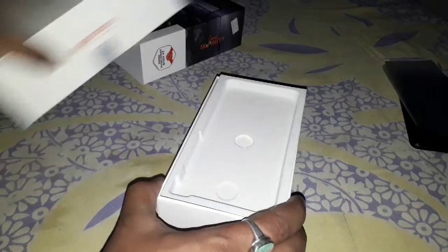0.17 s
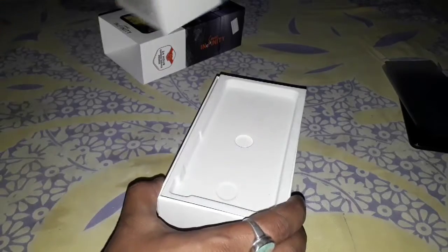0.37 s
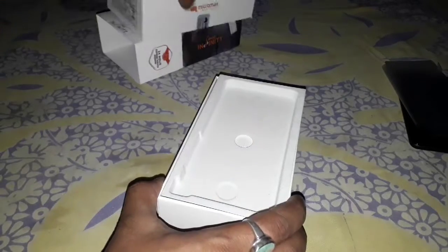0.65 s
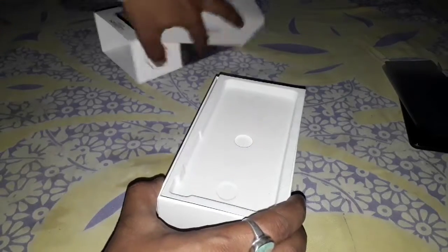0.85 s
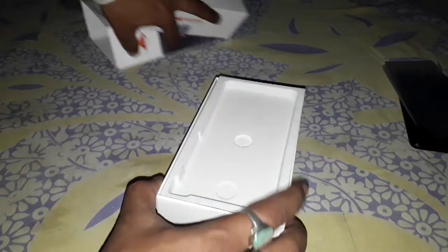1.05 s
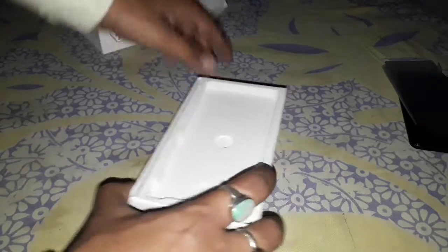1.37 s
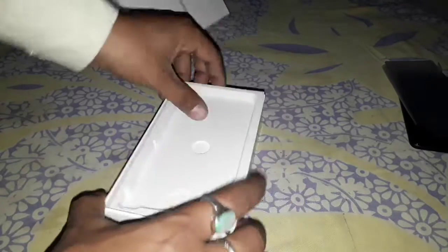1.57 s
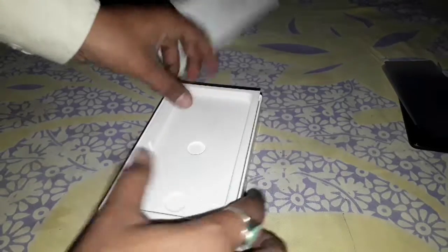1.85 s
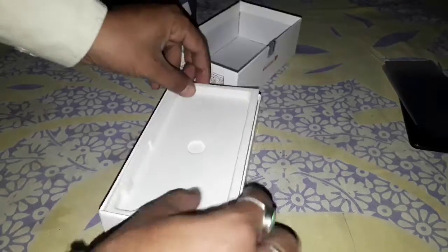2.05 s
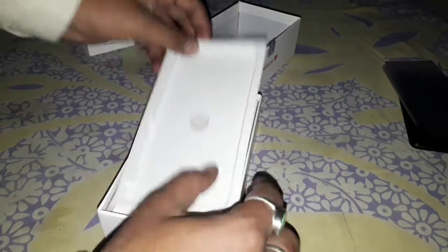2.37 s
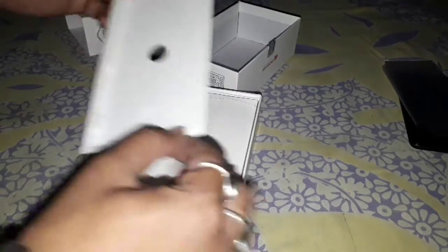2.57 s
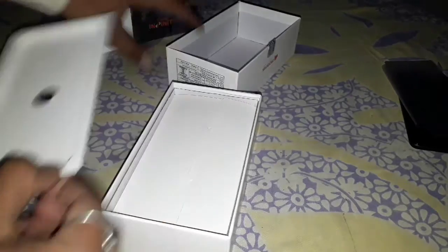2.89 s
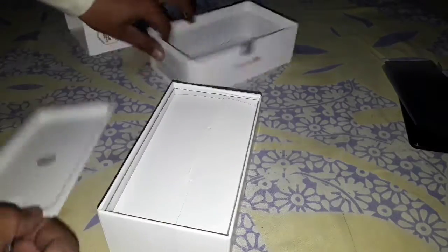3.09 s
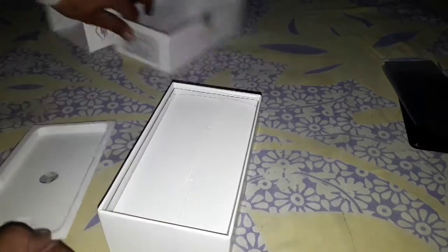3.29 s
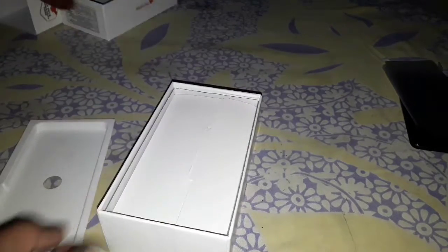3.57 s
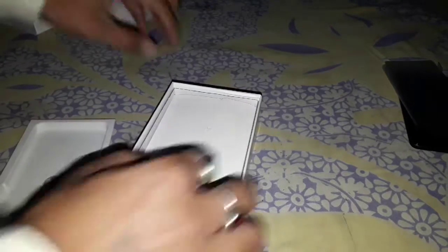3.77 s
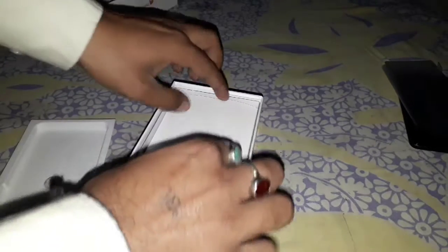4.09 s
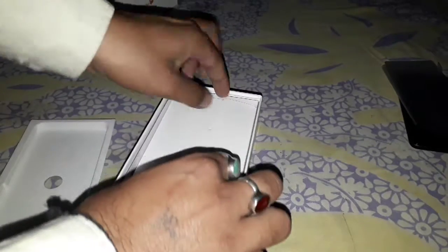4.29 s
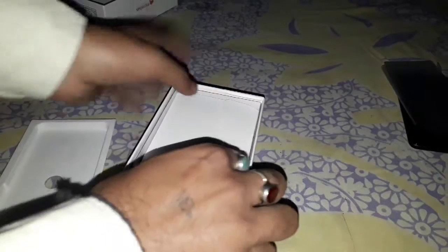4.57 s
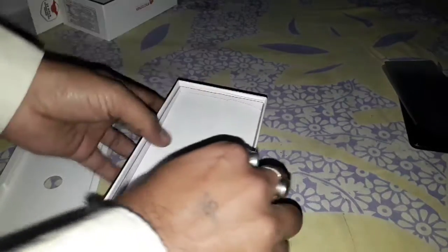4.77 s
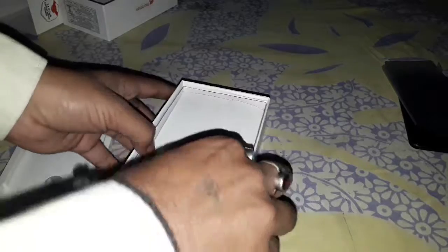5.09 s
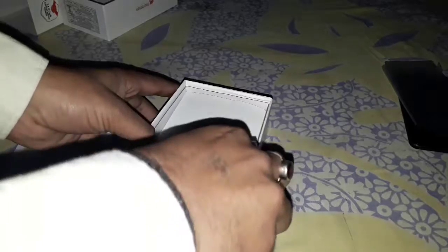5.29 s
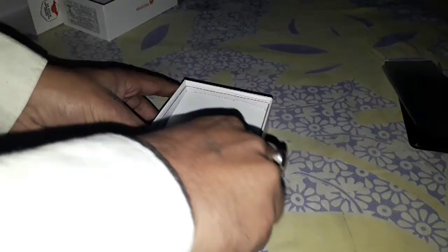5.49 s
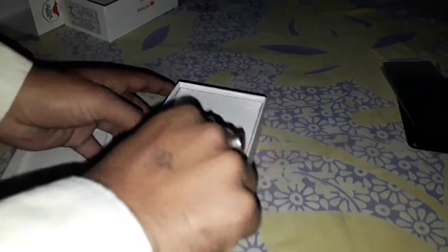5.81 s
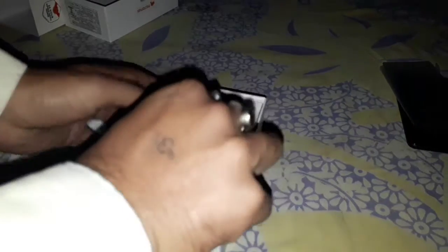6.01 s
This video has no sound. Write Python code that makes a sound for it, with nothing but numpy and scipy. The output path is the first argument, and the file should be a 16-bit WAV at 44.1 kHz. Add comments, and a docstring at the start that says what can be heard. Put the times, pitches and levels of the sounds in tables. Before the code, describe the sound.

Light, irregular cardboard knocks and fingernail ticks mix with the rub of card on card and cloth, and a few dull thumps on a mattress. A thin tray is set down with a hollow clatter, a flap creaks briefly, and small clicks cluster near the end. It is all heard from about a metre away in a quiet, slightly echoing room over a faint hiss and electrical hum.

```python
"""Cardboard boxes on a bed

Hands move small boxes and a thin tray about on a bed in a quiet bare room, mostly about a metre from
a phone microphone. Struck panels knock, edges and nails tick, the mattress thumps, the tray lands and
rocks. Card catches as it slides on card and cloth, and a tight flap creaks in small slips.
The room answers with a long soft tail; mains hum and hiss lie underneath."""
import sys
import numpy as np
from scipy import signal
from scipy.fft import rfft, irfft, next_fast_len
from scipy.io import wavfile
from scipy.ndimage import map_coordinates

SR = 44100
rng = np.random.default_rng(int(sys.argv[2]) if len(sys.argv) > 2 else 0)


def wrap_up_sound(samples):
    """Save the sound to the file named by the first command line argument, as 16-bit audio."""
    columns = np.atleast_2d(samples).T
    # keep every value between -1 and 1, then stretch to whole-number steps
    tamed = np.clip(columns, -1, 1)
    steps = np.round(tamed * 32767).astype(np.int16)
    wavfile.write(sys.argv[1], SR, steps)


N = 270982

# card sliding about: (time [s], panel drone [dB], drone brightness [dB], surface rustle [dB])
SLIDES = [(0, -50.5, -0.5, -62.5), (.1, -60.5, 1.5, -75.5), (.49, -71.5, -3, -71.5), (.6, -54, 6, -61),
          (.8, -54, 3, -71), (1.02, -52.5, 5, -58), (1.2, -62.5, 9, -64), (1.39, -55, 2, -67),
          (1.5, -47, 3.5, -61), (1.63, -52.5, -2, -63), (1.85, -67.5, -7.5, -70),
          (2.15, -56.5, -9.5, -58.5), (2.51, -68.5, -0.5, -74.5), (3.0, -72, -2.5, -72),
          (3.2, -71, -7, -63), (3.4, -61.5, 5, -65), (3.76, -73, 3, -75), (4.2, -63.5, 2, -70.5),
          (4.45, -59.5, -1.5, -69), (4.8, -63.5, 6.5, -67.5), (5.4, -57, 2, -71.5), (5.6, -59.5, 1, -65.5),
          (6.14, -63, 1.5, -68.5)]


def amp(db):
    """Gain of a dB value."""
    return 10 ** (np.asarray(db) / 20)


def unit(x):
    """x scaled to rms 1."""
    return x / np.sqrt(np.mean(x ** 2) + 1e-20)


def along(points, hz):
    """Reads (frequency [Hz], value) points on a log frequency axis."""
    f, values = np.transpose(points)
    return np.interp(np.log(hz + 1), np.log(f + 1), values)


def curves(rows):
    """One value per sample for each column after the time."""
    times, *columns = np.transpose(rows)
    return [np.interp(np.arange(N) / SR, times, column) for column in columns]


def wobble(rate):
    """A smooth random curve, rate knots a second."""
    return map_coordinates(rng.standard_normal(int(N * rate / SR) + 4), [np.arange(N) * rate / SR])


def filtered(x, response):
    """x through a complex frequency response."""
    size = next_fast_len(len(x) + 4096)
    return irfft(rfft(x, size) * response(np.fft.rfftfreq(size, 1 / SR)), size)[:len(x)]


def coloured(x, spectrum):
    """x through a curve of (frequency [Hz], gain [dB]) points."""
    return filtered(x, lambda f: amp(along(spectrum, f)))


def peak(f, hz, width_hz):
    """One causal resonance of top gain 1."""
    return 1j * f * width_hz / (hz * hz - f * f + 1j * f * width_hz)


def low_pass(f, hz):
    """A causal two-pole roll-off."""
    return 1 / (1 + 1j * f / hz) ** 2


def brightened(x, split_hz, db):
    """x at rms 1, then its treble raised and its bass lowered by a dB curve."""
    low = filtered(unit(x), lambda f: 1 / (1 + (f / split_hz) ** 4))
    return amp(-db) * low + amp(db) * (unit(x) - low)


def add(track, at, sound):
    """Mixes a sound in at a time in seconds."""
    part = track[..., round(at * SR):][..., :sound.shape[-1]]
    part += sound[..., :part.shape[-1]]


def ring(modes, t):
    """Damped modes (frequency [Hz], level [dB], t60 [s]), each at a slightly random strength."""
    return sum(amp(db + rng.normal(0, 1.64) - 60 * t / t60) * np.sin(2 * np.pi * hz * t)
               for hz, db, t60 in modes)


def friction(count, hz, tilt_db, width):
    """Broad tilted noise with one bright band whose width is a share of its pitch."""
    def colour(f):
        broad = 0.51 * amp(tilt_db * np.log2(f / hz + 1e-3)) * f * f / (f * f + 900 ** 2)
        return (peak(f, hz, width * hz) + broad) * low_pass(f, 16000)
    return unit(filtered(rng.standard_normal(count), colour))


def distance_db(at):
    """Distance of the hand in dB over 1 m: farther contacts carry that much more room."""
    # busy hand to microphone: (time [s], distance [m])
    reach = [(0, 2.54), (.7, 0.9), (1.2, 1.04), (1.5, 1.23), (2.0, 1.14), (2.4, 0.86), (3.0, 1.1),
             (4.1, 1.2), (4.6, 0.38), (5.0, 1.2), (5.3, 0.41), (5.5, 1.13), (6.14, 0.92)]
    return 20 * np.log10(np.interp(at, *np.transpose(reach)) + 1e-3)


def background():
    """Room tone: steady hiss and a slightly wavering mains hum."""
    # noise floor: (frequency [Hz], relative density [dB])
    hiss_spectrum = [(25, -25), (50, -4), (70, -2), (140, 3), (190, -8), (230, -15), (300, -6), (520, -9.5),
                     (1500, -14), (3500, -21), (9000, -28.5), (16000, -19.5)]
    # mains harmonics: (frequency [Hz], rms level [dB])
    harmonics = [(100, -66), (200, -82)]
    t = np.arange(N) / SR
    hiss = unit(coloured(rng.standard_normal(N), hiss_spectrum))
    hum = sum(amp(db + wobble(6)) * np.sqrt(2) * np.sin(2 * np.pi * hz * t + 0.11 * wobble(3.6))
              for hz, db in harmonics)
    return amp(-70 + 0.74 * wobble(7.1)) * hiss + hum


def side_hiss():
    """A faint steady hiss that sets left apart from right."""
    # hiss colour: (frequency [Hz], relative density [dB])
    spectrum = [(24, -43), (40, -13), (112, -3.5), (1660, -1.5), (5390, -6.5), (7840, -15.5), (13300, -4.5),
                (15800, -13)]
    return amp(-78) * unit(coloured(rng.standard_normal(N), spectrum))


def room(sent):
    """Bare walls return a diffuse tail, drawn anew every quarter second, and low standing waves."""
    # reverberation time: (frequency [Hz], t60 [s])
    decay = [(60, 0.94), (200, 0.86), (600, 0.63), (2000, 0.71), (6000, 0.58), (14000, 0.36)]
    # room modes: (frequency [Hz], level [dB], t60 [s])
    modes = [(70.2, 2.5, 0.69), (97, -11.5, 0.54), (150, -5.5, 0.41), (210.1, 1.5, 1.05), (241.2, -4, 1),
             (360, -44, 3.1)]
    diffuse, step, predelay_s = np.zeros(N), SR // 4, 0.006
    for start in range(0, N, step):
        bands, t, noise = signal.stft(rng.standard_normal(SR), SR, nperseg=512)
        tail = signal.istft(noise * amp(-60 * t / along(decay, bands)[:, None]), SR, nperseg=512)[1]
        tail /= np.linalg.norm(tail)
        add(diffuse, start / SR + predelay_s, signal.fftconvolve(sent[start:start + step], tail))
    boom = lambda f: sum(amp(db) * peak(f, hz, np.log(1000) / np.pi / t60) for hz, db, t60 in modes)
    standing = filtered(np.pad(sent, (0, SR)), boom)[:N]
    return amp(-10) * diffuse + amp(8) * standing


def mattress_rumble():
    """The sliding movements lean on the mattress: a low lumpy rumble that follows the rustle."""
    rustle_db = curves(SLIDES)[-1]
    lumps = rng.standard_normal(N) * amp(4 * wobble(12))
    return amp(rustle_db - 1.5) * unit(filtered(lumps, lambda f: peak(f, 109, 90) ** 2))


def sliding_card():
    """Fibres catch in clumps, driving the panels (drone) and the surface (rustle)."""
    # rubbed panels: (frequency [Hz], relative density [dB])
    drone_spectrum = [(71, -15), (120, 0), (125, -22), (157, 3), (353, 3), (838, -3), (989, -6),
                      (2500, -29), (3250, -24), (5500, -120)]
    # rubbed surface: (frequency [Hz], relative density [dB])
    rustle_spectrum = [(710, -42), (1200, 0.5), (1540, -2), (2040, -3), (3180, -3), (3620, -6.5),
                       (3910, -7), (8530, -10.5), (16000, -10)]
    drone_db, drone_bright_db, rustle_db = curves(SLIDES)
    rustle_bright_db = 0.09 * (rustle_db + 67)  # faster sliding is brighter
    catches = rng.standard_normal((2, N))
    catches[0] *= amp(2.5 * wobble(40) + 3 * wobble(300))
    catches[1] *= amp(1.5 * wobble(40) + 2.1 * wobble(600))
    drone = brightened(coloured(catches[0], drone_spectrum), split_hz=700, db=drone_bright_db)
    rustle = brightened(coloured(catches[1], rustle_spectrum), split_hz=4300, db=rustle_bright_db)
    return amp(drone_db) * drone + amp(rustle_db) * rustle


def scuffs():
    """A brief stroke of card on card swells and stops, its fibres catching unevenly."""
    # strokes: (time [s], length [s], level [dB], bright band [Hz], tilt [dB/octave])
    strokes = [(.039, .012, -49.5, 4740, -7), (0.476, 0.057, -65.5, 6040, 3),
               (.835, .031, -46.5, 7600, -1.5), (0.886, 0.054, -57, 5160, 1),
               (1.541, 0.01, -50.5, 3050, 1.5), (1.549, 0.023, -51, 5960, -2.5),
               (1.585, 0.075, -48.5, 3600, 2.5), (1.646, 0.035, -43, 4220, -5),
               (1.663, 0.015, -41.5, 4100, -6), (1.663, 0.014, -39.5, 5000, -2),
               (1.97, 0.065, -53.5, 6760, 3), (2.037, 0.022, -53, 6200, -4),
               (2.117, 0.032, -55.5, 6500, -2), (2.2, 0.034, -59.5, 4700, -3),
               (2.441, 0.015, -59, 2500, -1.5), (2.551, 0.039, -54.5, 2962, -2),
               (2.596, 0.054, -65.5, 7300, 2), (2.714, 0.042, -58.5, 7150, 6), (2.75, 0.016, -60, 2530, 1),
               (3.054, .057, -59.5, 6140, -2), (3.056, .027, -52, 900, -4), (3.471, 0.042, -62, 2760, -2.5),
               (4.457, 0.11, -61, 3070, -11.5), (4.886, 0.024, -54.5, 2680, -6),
               (5.007, 0.036, -57, 2700, -8.5), (5.01, 0.094, -65.5, 6300, 4),
               (5.793, 0.033, -53.5, 2590, -2.5)]
    out = np.zeros(N)
    for at, length, db, hz, tilt_db in strokes:
        swell = np.abs(np.sin(np.linspace(0, np.pi, round(length * SR)))) ** 0.55
        add(out, at, amp(db) * friction(len(swell), hz, tilt_db, width=0.1) * swell)
    return out * amp(0.55 * wobble(350))


def flap_creak():
    """A tight flap slips in small uneven steps that ring the card. Rows: direct, sent to the room."""
    # stick and slip: (time [s], slip rate [1/s], slip level [dB])
    slipping = [(4.31, 166, -45), (4.33, 170, -22.5), (4.37, 140, -19), (4.39, 88, -18), (4.44, 110, -23),
                (4.45, 110, -55)]
    # flap resonances: (frequency [Hz], width [Hz], gain [dB])
    resonances = [(394, 170, 3), (1100, 280, 1), (1760, 360, -6), (3000, 580, -15.5), (7150, 2000, -19.5)]
    rate, db = curves(slipping)
    slip_count = np.floor(np.cumsum(rate * amp(wobble(60))) / SR)
    slips = np.diff(slip_count, prepend=0) * amp(1.5 * rng.standard_normal(N))
    slips *= db > -39  # silent outside the creak
    flap = lambda f: sum((-1) ** k * amp(gain_db) * peak(f, hz, width_hz)
                         for k, (hz, width_hz, gain_db) in enumerate(resonances))
    return amp(db) * filtered(slips, flap) * amp([[2], [-6]])


def mattress_thumps():
    """Weight lands softly on the mattress: one low damped tone with a rounded start."""
    # landings: (time [s], level [dB], pitch [Hz], t60 [s])
    landings = [(0.554, -43.5, 87.5, 0.26), (0.921, -43, 71.4, 0.13), (1.517, -26.5, 88, 0.097),
                (1.768, -32.5, 88.6, 0.14), (2.003, -21.5, 92.8, 0.31), (3.014, -39, 76, 0.046),
                (3.128, -52, 94.2, 0.24), (3.237, -39, 121, 0.08), (3.498, -52.5, 90, 0.26),
                (4.099, -57.5, 71.6, 0.24), (4.728, -56, 95.4, 0.35)]
    out, t = np.zeros(N), np.arange(SR // 2) / SR
    attack = 1 - np.exp(-t / 0.0015)
    for at, db, hz, t60 in landings:
        add(out, at, amp(db - 60 * t / t60) * np.sin(2 * np.pi * hz * t) * attack)
    return out


def tray():
    """The thin tray rings hollow; harder contacts wake its upper modes."""
    # the tray lands and rocks: (time [s], level [dB], hardness [dB])
    contacts = [(3.243, -18.5, -1), (3.273, -26, -5.5), (3.31, -41.5, 7.5), (3.402, -43, 10.5),
                (3.457, -52, 0), (3.525, -46.5, 11)]
    # tray modes: (frequency [Hz], level [dB], t60 [s])
    modes = [(232.4, -4.5, 0.12), (490, -17, 0.036), (670, -16, 0.046), (803, -10, 0.03),
             (1494, -19.5, 0.042), (2400, -21.5, 0.022)]
    out, t = np.zeros(N), np.arange(SR // 3) / SR
    attack, lowest_hz = 1 - np.exp(-t / 0.0004), modes[0][0]
    for at, db, hard_db in contacts:
        struck = [(hz, level + hard_db * (hz > lowest_hz), t60) for hz, level, t60 in modes]
        add(out, at, amp(db) * ring(struck, t) * attack)
    return out


def edge_ticks():
    """An edge or nail snaps, with a burst of noise that dies at once. Rows: direct, sent to the room."""
    # small contacts: (time [s], level [dB], bright band [Hz], tilt [dB/octave])
    contacts = [(.043, -43.5, 4400, -3), (0.202, -50, 2260, -3.5), (.416, -56, 2470, -4.5),
                (.541, -37, 2330, -0.5), (.587, -36.5, 2250, -4.5), (.596, -35.5, 2020, -4),
                (.943, -33.5, 3700, 3), (.969, -37, 2480, -4.5), (1.209, -53, 6000, 0),
                (1.314, -41, 3340, -3.5), (1.345, -42.5, 3170, -1.5), (1.396, -41.5, 4760, -1.5),
                (1.435, -43.5, 4230, -5), (1.496, -49, 3250, 2), (1.585, -40, 3480, 3),
                (1.67, -35, 2740, -16), (1.904, -42.5, 4000, -3), (1.933, -50, 3530, 1),
                (1.992, -29.5, 2200, -8.5), (2.297, -42, 2500, -4), (2.31, -44, 2590, -6),
                (2.357, -46, 1230, -4), (2.413, -53, 4950, 3), (2.66, -41.5, 2460, 2),
                (2.996, -49, 2370, -5.5), (3.092, -43, 2570, 2), (3.241, -41, 2480, -3),
                (3.274, -47, 2400, 8), (3.401, -53, 2660, 2), (3.991, -42.5, 1290, -2),
                (3.998, -44.5, 2630, -1), (4.106, -39, 1347, -4.5), (4.406, -50, 1110, -4),
                (4.418, -46, 2680, 4), (4.506, -40.5, 6340, -2), (4.594, -41, 2270, -1),
                (4.718, -48, 2250, 0), (4.987, -52, 3530, 0), (5.006, -38, 1060, -7.5),
                (5.052, -45, 1590, -12), (5.229, -48, 1500, -6), (5.305, -40, 1280, -8),
                (5.354, -44.5, 1300, -7), (5.392, -49, 3000, -16), (5.418, -36.5, 1390, -2.5),
                (5.449, -35.5, 1450, -4), (5.477, -33, 1410, -6), (5.492, -30, 1400, -5),
                (5.504, -31, 1670, -5), (5.927, -46, 2730, -4.5), (5.961, -52, 1000, -7)]
    out, t = np.zeros((2, N)), np.arange(SR // 12) / SR
    attack, send_db = 1 - np.exp(-t / 0.00036), 6
    for at, db, hz, tilt_db in contacts:
        t60 = 0.023 * amp(0.82 * distance_db(at))  # the far, larger boxes tick longer
        envelope = attack * amp(-60 * t / t60 * [[1], [7]])  # the room mostly hears the sharp front
        burst = friction(len(t), hz, tilt_db, width=0.12) * envelope * [[0.611], [1.786]]
        snap = 1.22 * np.sin(2 * np.pi * hz * t + 0.063) * np.exp(-1.2 * hz * t)
        snap = filtered(snap, lambda f: 1 - 1 / (1 + 1j * f / 250))  # too small to push bass
        add(out, at, amp([[db], [db + send_db + distance_db(at)]]) * (burst + snap))
    return out


def box_knocks():
    """Each blow rings a panel; card is lossy, so the ring is partly rough. Rows: direct, room send."""
    # blows on the boxes: (time [s], level [dB], panel pitch [Hz], overtone level [dB])
    blows = [(.004, -40, 405, -11), (0.044, -39, 776, -9), (.542, -29.5, 754, -2), (.548, -27.5, 297, 0),
             (.588, -20.5, 286.7, 2.5), (.628, -24.5, 764, -9), (.842, -28, 980, 0.5),
             (.919, -33.5, 920, -12), (.943, -26, 895, -11), (.95, -32, 890, -13), (.97, -29, 823, -11.5),
             (1.093, -33, 1260, -15), (1.176, -35, 830, -22), (1.209, -41.5, 920, -10),
             (1.31, -41.5, 413, -26), (1.443, -30, 282, -13), (1.508, -28, 240, -20),
             (1.558, -34.5, 204, -16), (1.614, -34.5, 197, -8), (1.653, -26, 377, -25),
             (1.655, -26, 1206, -6), (1.904, -39, 275, -16), (1.991, -17.5, 370, -11),
             (2.011, -21.5, 198, -10), (2.049, -30, 342, -15), (2.099, -25.5, 215, -19),
             (2.294, -36.5, 207.6, -8), (3.094, -33, 1310, -16), (3.147, -44.5, 200, -7),
             (3.99, -39, 381, 3.5), (3.996, -34.5, 1194, -17), (4.108, -30.5, 543, -15),
             (4.418, -37, 1036, -14), (4.579, -39, 787, -6), (4.593, -38.5, 640, -2),
             (4.626, -43, 682, -10), (4.893, -32, 392, -7), (5.007, -37, 307, 0.5), (5.049, -42, 506, 2),
             (5.304, -34, 610, -15), (5.352, -34, 523, -10), (5.417, -40, 630, -11), (5.45, -38, 490, 4),
             (5.475, -33, 486, -14), (5.492, -31.5, 490, -4), (5.504, -35.5, 400, -7), (5.802, -38, 508, 1),
             (5.926, -38, 465, -3)]
    # panel overtones: (pitch [ratio], level [dB], t60 [ratio])
    overtones = [(1.55, 1.5, 0.31), (2.15, -4, 0.5), (3.5, -8, 0.75), (6.3, -19, 0.14)]
    out, t = np.zeros((2, N)), np.arange(SR // 6) / SR
    attack, rough_share, send_db = 1 - np.exp(-t / 0.00048), 0.44, 0.5
    for at, db, hz, over_db in blows:
        t60 = 0.054 * (hz / 500) ** -0.45 * amp(0.1 * (db + 32))  # low panels and hard blows ring longer
        upper = [(hz * ratio, level + over_db, t60 * share) for ratio, level, share in overtones]
        tone = ring([(hz, 0, t60)] + upper, t)
        rattle = unit(filtered(rng.standard_normal(len(t)), lambda f: peak(f, 0.99 * hz, 1.2 * hz) ** 2))
        knock = (1 - rough_share) * tone + rough_share * rattle * amp(-60 * t / t60)
        knock = filtered(knock * attack, lambda f: low_pass(f, 1680))  # fingers and cloth are soft
        add(out, at, amp([[db], [db + send_db + distance_db(at)]]) * knock)
    return out


def scene():
    """One microphone near the bed feeds both channels; only a faint hiss tells them apart."""
    impacts = box_knocks() + edge_ticks() + tray() + mattress_thumps()
    direct, sent = impacts + scuffs() + sliding_card() + flap_creak() + mattress_rumble()
    mid = direct + room(sent) + background()
    side = side_hiss()
    return np.array([mid + side, mid - side])


def record(dry):
    """The phone cuts deep bass, dips in the treble and is band-limited; its converter sits off zero."""
    # phone microphone response: (frequency [Hz], gain [dB])
    microphone = [(20, -3.5), (8000, 0), (8900, 0), (9500, -7.5), (10300, -4), (13000, -6.5),
                  (16000, -11.5)]
    bass_hz, top_hz, offset = 62, 15850, -0.0005
    low_cut = lambda f: (f / bass_hz) ** 8 / (1 + (f / bass_hz) ** 8) + 0.16
    phone = lambda f: (f < top_hz) * amp(along(microphone, f)) * low_cut(f)
    return np.array([filtered(channel, phone) for channel in dry]) + offset


dry = scene()
out = record(dry)
wrap_up_sound(out)
```